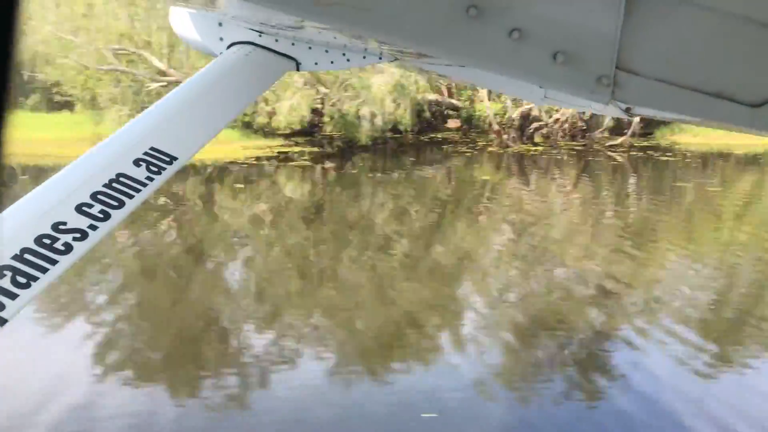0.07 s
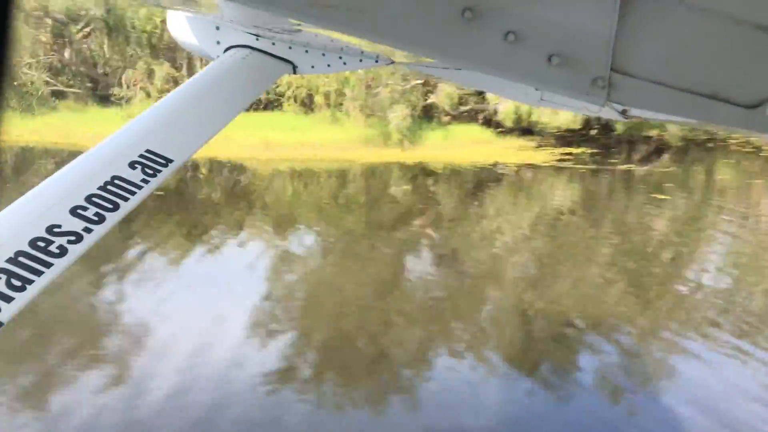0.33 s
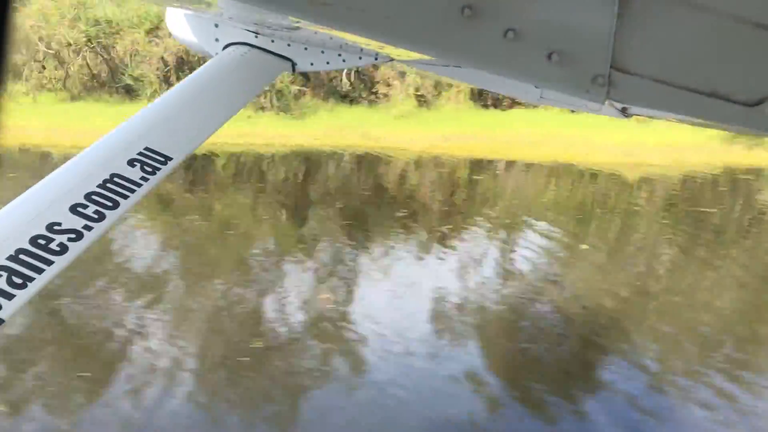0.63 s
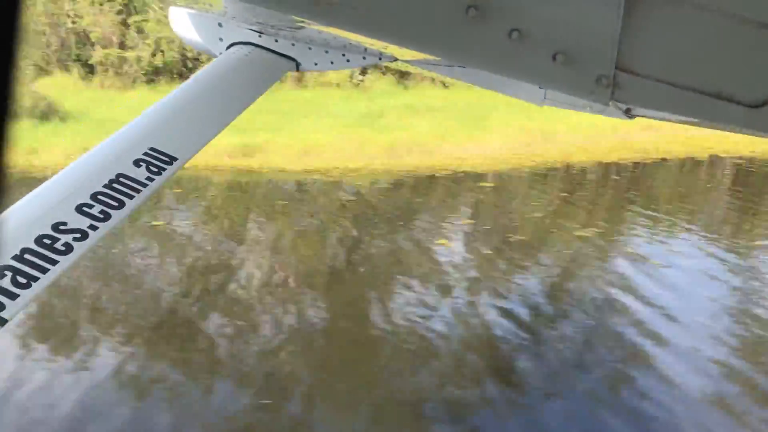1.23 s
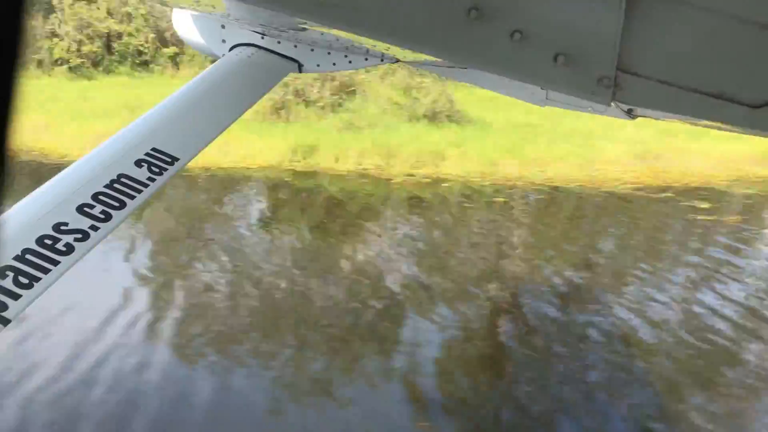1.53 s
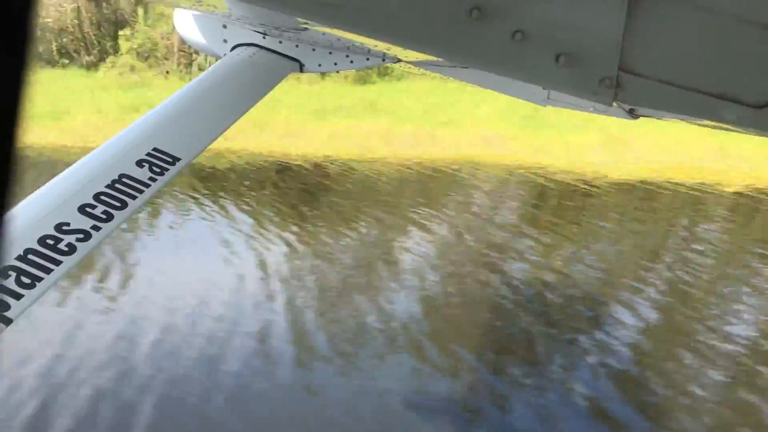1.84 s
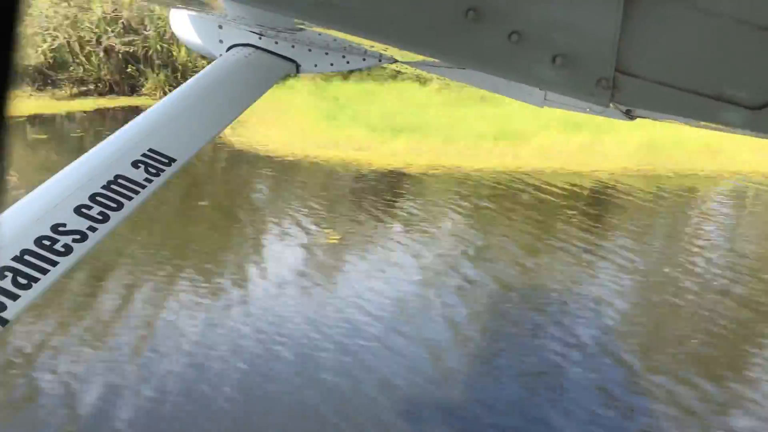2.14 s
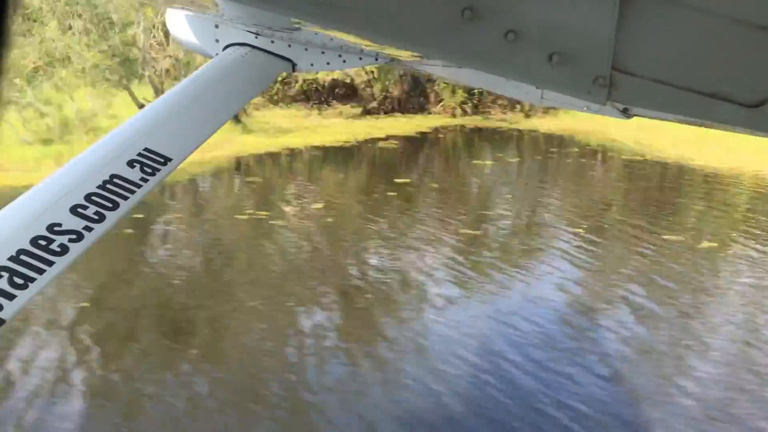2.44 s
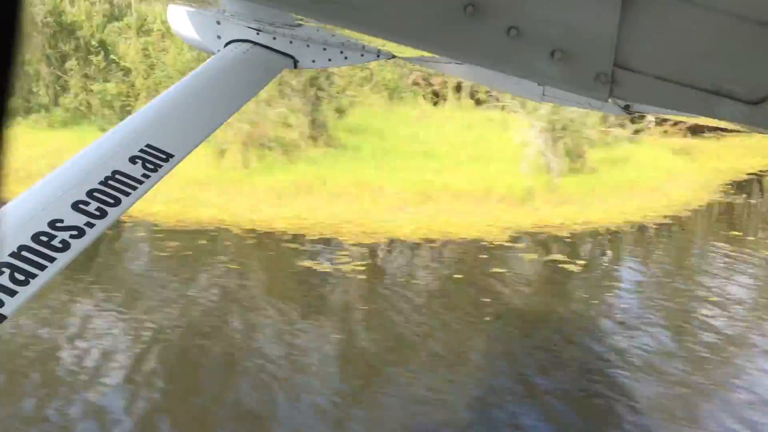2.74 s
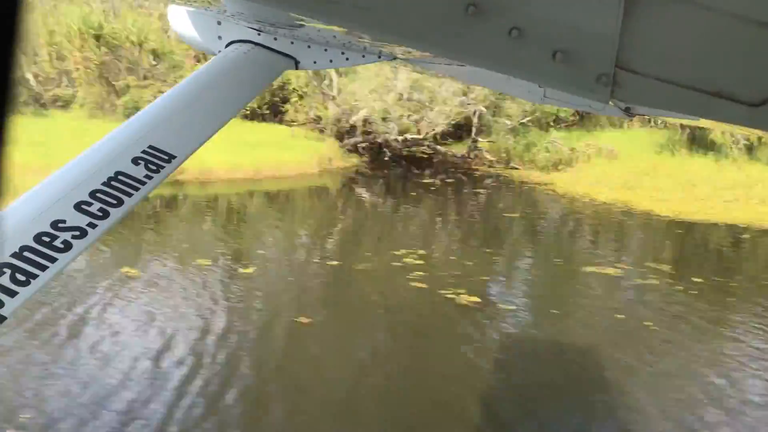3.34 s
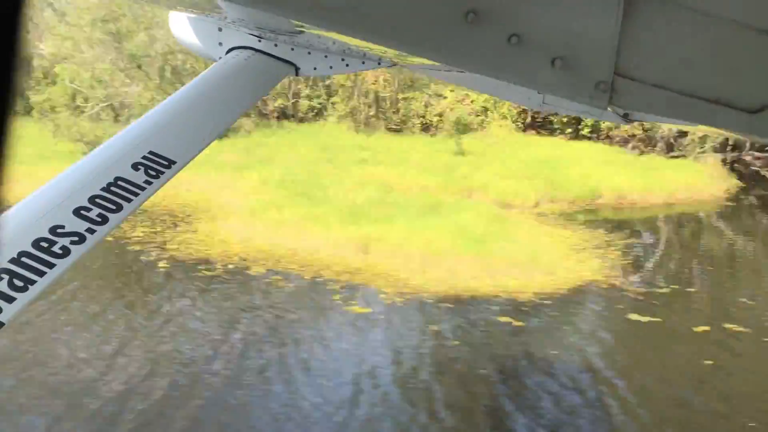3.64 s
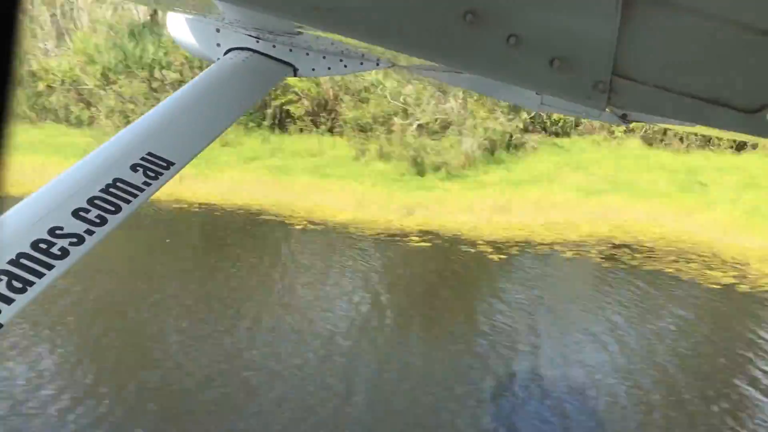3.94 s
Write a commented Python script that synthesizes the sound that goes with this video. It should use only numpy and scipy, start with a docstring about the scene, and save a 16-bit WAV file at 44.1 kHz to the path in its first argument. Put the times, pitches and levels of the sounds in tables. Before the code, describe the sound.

A small plane's propeller drones over a low rumble and rushing air, heard from inside.

```python
"""Inside the cabin of a small turboprop floatplane moving along a river at steady power.
From the start the three-bladed propeller drones at multiples of its shaft rate over a low cabin rumble;
air and exhaust rush through the panels, the gears hum faintly and the turbine whines thinly.
Around two seconds the blade tone begins to dip. Near three seconds it is weakest, while the rush and
the panels' shudder swell. In the last second these ease and the blade tone returns louder than before."""
import sys
import numpy as np
from scipy import signal
from scipy.fft import rfft, irfft
from scipy.io import wavfile

SR = 44100
rng = np.random.default_rng(int(sys.argv[2]) if len(sys.argv) > 2 else 0)


def log_audio(samples):
    """Write samples as a 16-bit WAV file to the path given in sys.argv[1]."""
    # one column per channel
    frames = np.atleast_2d(samples).T
    # limit to full scale, then quantise
    limited = np.clip(frames, -1, 1)
    pcm = np.round(limited * 32767).astype(np.int16)
    wavfile.write(sys.argv[1], SR, pcm)


N = 176400

# spectrum of the cabin rumble at 0 dB gain: (frequency [Hz], spectral density [dB per Hz])
RUMBLE_SPECTRUM = [(6, -69), (20, -71), (33, -61), (48, -47.5), (75, -42), (101, -41.5), (135, -44.5),
                   (168, -53), (260, -76)]
# envelope of the rumble and boom: (time [s], gain [dB])
RUMBLE_GAIN = [(0, 0.5), (.68, 1.5), (1.1, -5), (1.7, 0), (2.15, -1.5), (2.6, .4), (3.25, 2), (3.7, 0),
               (4, 0.5)]
# spectrum of the panels' shudder at 0 dB gain: (frequency [Hz], spectral density [dB per Hz])
SHUDDER_SPECTRUM = [(120, -72.5), (175, -57), (202, -47), (228, -51), (280, -50), (330, -55.5), (400, -61),
                    (500, -72.5), (800, -94.5)]
# envelope of the shudder: (time [s], gain [dB])
SHUDDER_GAIN = [(0, -1.2), (.8, -2), (1.4, -1.1), (2.1, 0.2), (2.65, 3), (3.0, 2.5), (3.42, 4.5),
                (3.8, 1.2), (4, -0.2)]
# spectrum of the exhaust roar at 0 dB gain: (frequency [Hz], spectral density [dB per Hz])
ROAR_SPECTRUM = [(250, -70.5), (480, -66.5), (670, -61), (800, -63), (940, -64.5), (1010, -69.5),
                 (1110, -68), (1240, -70.5), (1420, -77), (1680, -77.5), (1970, -87.5), (3000, -104)]
# narrow resonances in the roar at 0 dB gain: (frequency [Hz], width [Hz], level [dB])
ROAR_RESONANCES = [(2130, 140, -59), (2440, 60, -68), (2760, 67, -62), (3510, 150, -62), (3660, 220, -63.5),
                   (4300, 110, -69.5), (11350, 250, -80)]
# spectrum of the air hiss at 0 dB gain: (frequency [Hz], spectral density [dB per Hz])
HISS_SPECTRUM = [(700, -93), (1600, -81), (2400, -84), (3100, -87), (3750, -85.5), (4350, -87.5),
                 (4900, -91), (6700, -92.5), (8400, -97.5), (9200, -97), (10400, -104), (11500, -101.5),
                 (13000, -105.5), (15600, -110.5)]
# strength of the rush, of which roar, hiss and whine each follow a share: (time [s], gain [dB])
RUSH_GAIN = [(0, 0.9), (.6, -0.6), (1.5, -1.34), (2.0, -0.5), (2.5, 1.0), (2.8, 3), (3.0, 2.5), (3.22, 4.5),
             (3.42, 3.4), (3.7, 1.4), (4, 1.1)]
# gearbox tones: (frequency [Hz], level [dB])
GEAR_PARTIALS = [(787, -52.5), (1102, -56), (3843, -68)]
# pitch of the compressor whine: (time [s], frequency [Hz])
WHINE_PITCH = [(0, 9808), (.7, 9826), (1.4, 9808), (2.2, 9760), (3.2, 9750), (3.6, 9700), (4, 9680)]
# speed of the propeller shaft: (time [s], rotation rate [turns per s])
SHAFT_RATE = [(0, 31.33), (.5, 31.41), (1.2, 31.35), (2.0, 31.3), (2.7, 31.25), (3.4, 31.3), (4, 31.15)]
# envelope of the blade-passing tone: (time [s], level [dB])
BLADE_LEVEL = [(0, -16), (.2, -16.5), (.6, -18), (1.35, -16), (1.8, -22), (2.05, -15.5), (2.2, -26.5),
               (2.6, -19.5), (2.78, -29), (3.25, -22.5), (3.42, -17), (3.62, -12.5), (4, -11.5)]
# the other propeller tones: (harmonic number [multiple of the shaft rate], level [dB])
SHAFT_HARMONICS = [(2, -28.5), (4, -30), (5, -39), (6, -30), (8, -43.5), (9, -33), (11, -45.5), (12, -46),
                   (15, -56), (18, -49), (21, -51.5), (24, -53.5), (27, -54.5), (30, -58), (39, -58.5)]


def from_db(db):
    """Amplitude grows tenfold with every 20 dB."""
    return 10 ** (np.asarray(db) / 20)


def rms_one(x):
    """Normalisation to unit mean power."""
    return x / np.sqrt(np.mean(x ** 2) + 1e-20)


def in_time(rows):
    """Linear interpolation of a time table, one value per sample."""
    return np.interp(np.arange(N) / SR, *np.transpose(rows))


def phase_of(hz):
    """Phase is the time integral of frequency, here from a random start."""
    return 2 * np.pi * (np.cumsum(hz) / SR + rng.random())


def filtered_noise(gain_at):
    """Filtered white noise takes on the shape of the frequency response."""
    hz = np.maximum(np.arange(N // 2 + 1) * SR / N, 1)
    return irfft(rfft(rng.standard_normal(N)) * gain_at(hz), N)


def drift(corner_hz):
    """Low-pass noise gives a smooth random fluctuation of rms 1."""
    return rms_one(filtered_noise(lambda hz: 1 / (1 + (hz / corner_hz) ** 2)))


def coloured_noise(spectrum):
    """Noise of a given spectral density, falling 24 dB per octave beyond the table's ends."""
    points_hz, db = np.transpose(spectrum)

    def response(hz):
        skirts = np.minimum(1, np.minimum(hz / points_hz[0], points_hz[-1] / hz)) ** 4
        return from_db(np.interp(np.log(hz), np.log(points_hz), db)) * skirts
    return np.sqrt(SR / 2) * filtered_noise(response)


def resonant_noise(centre_hz, width_hz):
    """A randomly driven resonance passes a narrow band about its natural frequency; rms 1."""
    def response(hz):
        detuning = (hz ** 2 - centre_hz ** 2) / (2 * hz * width_hz)
        return (1 + detuning ** 2) ** -2
    return rms_one(filtered_noise(response))


def tone(phase, waver_db=2.54, wander_rad=0.29, waver_hz=1.2):
    """Slow random amplitude and phase modulation make a sinusoid waver; rms 1."""
    envelope = from_db(waver_db * drift(waver_hz))
    return rms_one(envelope * np.sin(phase + wander_rad * drift(waver_hz)))


def airframe():
    """Forced vibration: the cabin rumbles, its air booms at resonance and its panels shudder."""
    rumble = coloured_noise(RUMBLE_SPECTRUM)
    boom = from_db(-27.5) * resonant_noise(centre_hz=86.6, width_hz=7.2)
    shudder = coloured_noise(SHUDDER_SPECTRUM)
    return from_db(in_time(RUMBLE_GAIN)) * (rumble + boom) + from_db(in_time(SHUDDER_GAIN)) * shudder


def slipstream(rush_db, roar_share=0.92, hiss_share=0.97, gust_db=0.47):
    """Turbulent flow radiates broadband noise: exhaust roar and air hiss, fluttering together."""
    roar = coloured_noise(ROAR_SPECTRUM)
    roar += sum(from_db(db) * resonant_noise(hz, width) for hz, width, db in ROAR_RESONANCES)
    hiss = coloured_noise(HISS_SPECTRUM)
    flutter = from_db(gust_db * drift(corner_hz=8.7))
    return flutter * (from_db(roar_share * rush_db) * roar + from_db(hiss_share * rush_db) * hiss)


def gearbox():
    """Periodic meshing of gear teeth gives faint tones of steady pitch."""
    return sum(from_db(db) * tone(phase_of(np.full(N, hz))) for hz, db in GEAR_PARTIALS)


def turbine(rush_db, rush_share=0.9, spread_hz=14):
    """The compressor whine sags slowly in pitch; modulation by turbulence adds sidebands of noise."""
    pitch_hz = in_time(WHINE_PITCH)
    jitter_hz = spread_hz * drift(corner_hz=30)
    whine = tone(phase_of(pitch_hz + jitter_hz), waver_db=0.5)
    sidebands = rms_one(drift(corner_hz=240) * np.sin(phase_of(pitch_hz)))
    return from_db(rush_share * rush_db) * (from_db(-67.5) * whine + from_db(-65) * sidebands)


def propeller(blades=3):
    """A rotor radiates harmonics of its shaft rate, chiefly the one at which its blades pass."""
    shaft_phase = phase_of(in_time(SHAFT_RATE))
    drone = from_db(in_time(BLADE_LEVEL)) * tone(blades * shaft_phase, waver_db=1.13)
    for harmonic, db in SHAFT_HARMONICS:
        start_phase = 2 * np.pi * rng.random()
        drone += from_db(db) * tone(harmonic * shaft_phase + start_phase)
    return drone


def scene():
    """Superposition: the pressures of all sources add at a seat by the window."""
    rush_db = in_time(RUSH_GAIN)
    pressure = propeller() + gearbox() + airframe() + slipstream(rush_db) + turbine(rush_db)
    return pressure[None]


def record(dry, cutoff_hz=15700):
    """An elliptic low-pass filter cuts the highest treble steeply."""
    return signal.sosfilt(signal.ellip(12, .1, 80, cutoff_hz, fs=SR, output="sos"), dry)


dry = scene()
out = record(dry)
log_audio(out)
```